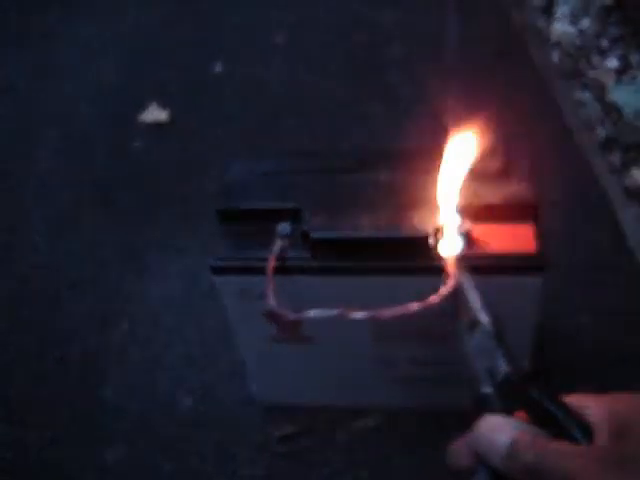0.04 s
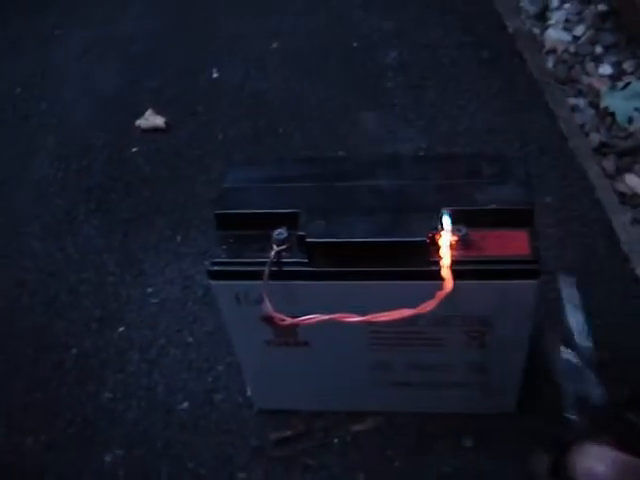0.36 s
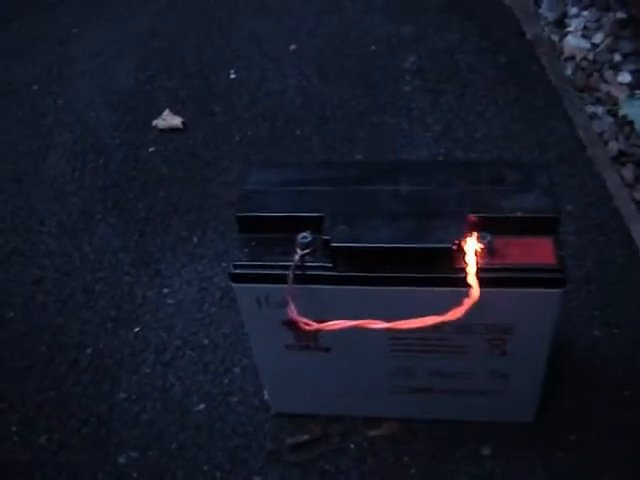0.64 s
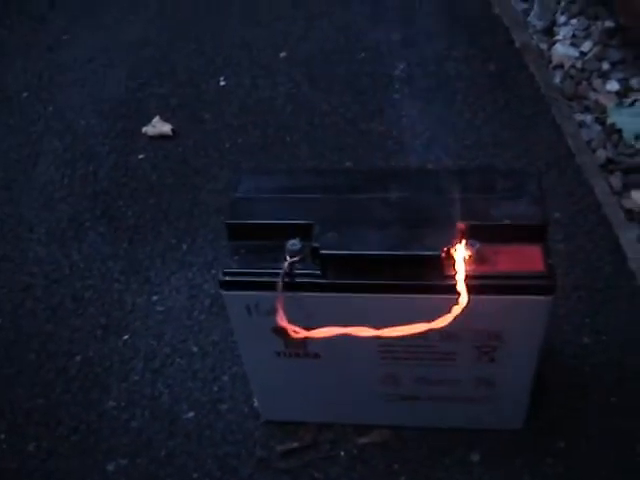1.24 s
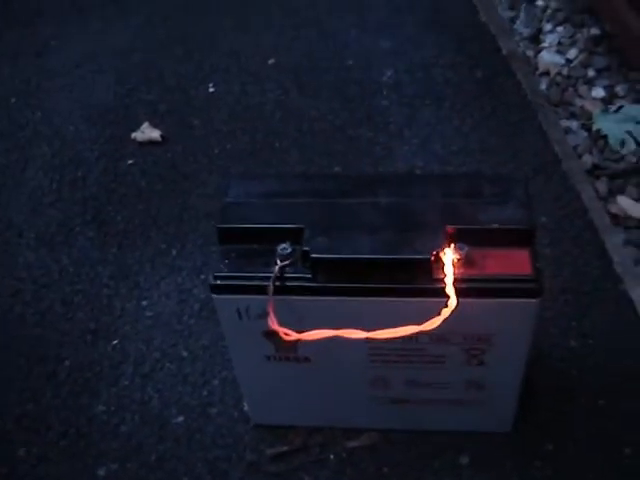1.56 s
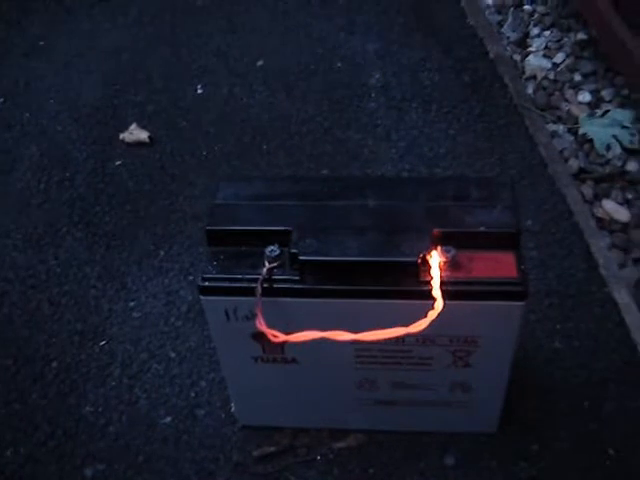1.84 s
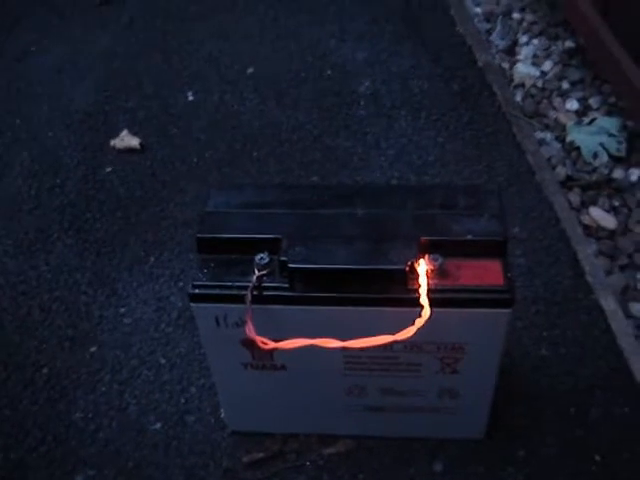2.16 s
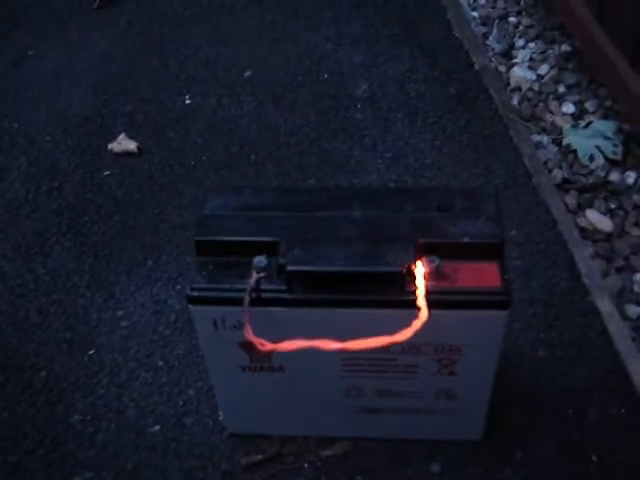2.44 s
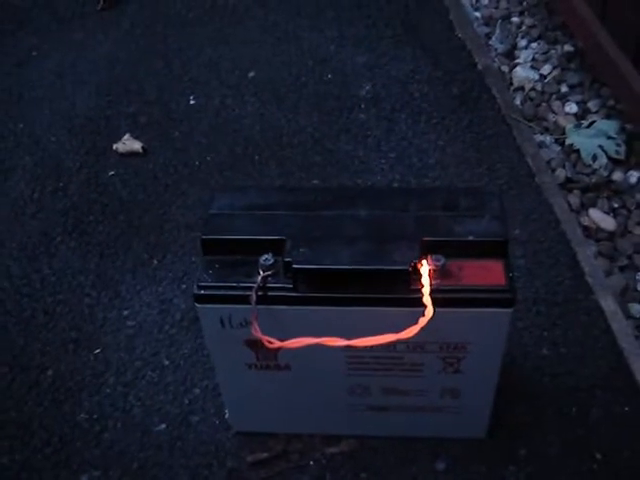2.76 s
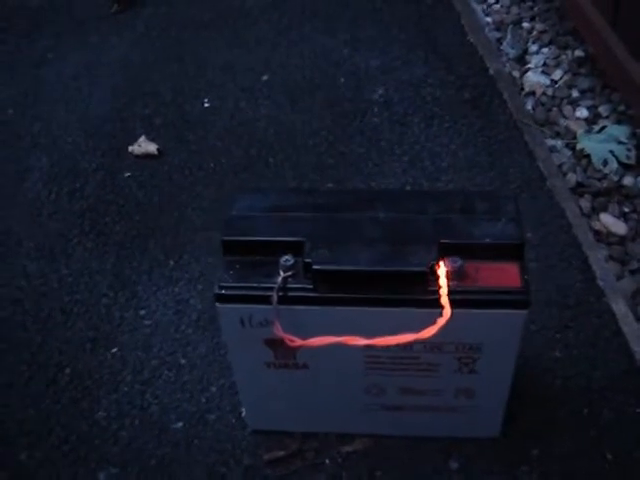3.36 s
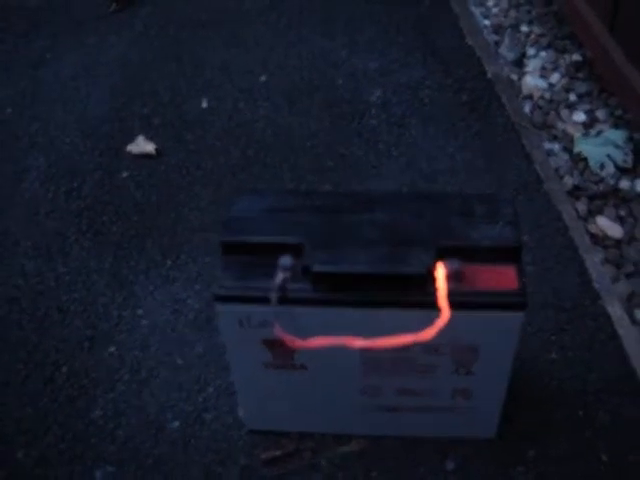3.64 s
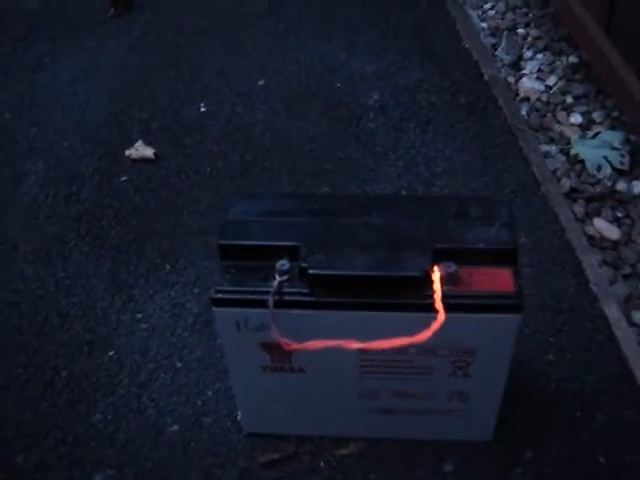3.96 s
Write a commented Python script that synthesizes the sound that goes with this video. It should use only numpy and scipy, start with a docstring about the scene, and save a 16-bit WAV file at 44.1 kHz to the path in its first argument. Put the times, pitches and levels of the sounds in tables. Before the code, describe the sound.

Sharp electrical sparks snap from a shorted battery, then a vehicle approaches in the distance.

```python
"""Short crackling bursts and sharp sparks, close to the microphone: a wire is shorting a lead battery
on a path outdoors. It arcs, with a weak echo off the ground and a fence, then glows and fizzes faintly.
Farther off, a vehicle draws near all the while, tyre roar over a low engine hum, with brief whistles
as it gets closer. A faint hiss lies under it all. The mono recorder's gain control ducks after
the loud bursts and creeps back."""
import sys
import numpy as np
from scipy import signal
from scipy.fft import rfft, irfft
from scipy.io import wavfile

SR = 44100
rng = np.random.default_rng(int(sys.argv[2]) if len(sys.argv) > 2 else 0)


def log_audio(samples):
    """Write samples as a 16-bit WAV file to the path given in sys.argv[1]."""
    # one column per channel
    frames = np.atleast_2d(samples).T
    # limit to full scale, then quantise
    limited = np.clip(frames, -1, 1)
    pcm = np.round(limited * 32767).astype(np.int16)
    wavfile.write(sys.argv[1], SR, pcm)


N = 176400
TIME = np.arange(N) / SR
FREQS = np.maximum(np.arange(N // 2 + 1) * SR / N, 1)

# Arcing at the battery. Each row: start in seconds, length in seconds, level in dB, tilt in dB per octave.
ARC_BURSTS = [(0.0118, 0.0024, -34.5, 2), (0.0734, 0.0078, -28.5, -0.5), (0.0920, 0.0032, -30.5, -9.5),
              (0.1023, .021, -31.5, 13), (0.123, 0.0089, -28.5, 2), (0.136, 0.029, -45, 4.5),
              (0.215, 0.0012, -19, -4.5), (0.231, 0.0023, -29, 1), (1.055, 0.018, -23.5, 2),
              (1.0737, 0.013, -22.5, 3.5), (1.085, 0.0085, -30.5, 5), (1.12, 0.01, -37, 3)]
# Tone of the arc. Each row: frequency in Hz, relative level in dB.
ARC_SPECTRUM = [(100, -14), (450, -18), (1000, -9), (2400, 0.5), (3800, -0.5), (5500, -5), (7800, -10),
                (10000, -12.5)]
# Single loud sparks. Each row: time in seconds, crack peak in dB, puff of hot air in dB.
LOUD_SPARKS = [(0.1060, -10, -28.5), (0.1095, -10.5, -35.5), (0.1214, -9.5, -33), (0.2174, -9.5, -67),
               (1.0583, -10.5, -46), (1.0607, -9, -35), (1.0667, -15, -58), (1.067, -2.5, -35.5),
               (1.0723, -5, -27), (1.0880, -2, -28)]
# The vehicle nearing the microphone. Each row: time in seconds, roar level in dB.
APPROACH_LEVEL = [(0, -45), (.4, -45), (1.0, -40.5), (1.5, -37), (2.1, -36), (2.6, -29.5), (3.0, -27),
                  (3.25, -26), (3.7, -21.5), (4.0, -22)]
# Tone of the tyre roar. Each row: frequency in Hz, relative level in dB.
TYRE_SPECTRUM = [(30, -32), (55, -15.5), (68, -3.5), (110, -9), (180, -2.5), (290, -8.5), (350, -10),
                 (460, -10), (520, 1.5), (830, -3.5), (1400, -4), (2300, -3.5), (3000, -10), (4200, -18),
                 (7000, -30), (10000, -42)]
# Resonances and dips in the roar. Each row: frequency in Hz, width in Hz, lift in dB.
TYRE_RESONANCES = [(295, 36, 4.5), (342, 41, 1.5), (407, 34, 5.5), (533, 12, 1), (616, 39, 3),
                   (689, 61, 4.5), (765, 50, 2.5), (937, 47, -3), (1006, 27, 7.5), (1082, 110, 4.5),
                   (1290, 44, 3), (1540, 90, -0.5), (1614, 48, 6), (1740, 120, 2.5), (1970, 120, 3),
                   (2450, 40, -5), (2480, 34, 1.5)]
# Engine speed. Each row: time in seconds, cycle rate in Hz.
ENGINE_CYCLE_RATE = [(0, 24.5), (1.75, 25), (2.7, 25), (3.2, 25.5), (3.55, 26), (4.0, 26)]
# Engine orders. Each row: multiple of the cycle rate, relative level in dB.
HUM_ORDERS = [(3, -26), (5, -31), (6, -17), (10, -22.5), (12, -32), (16, -23.5), (24, -19), (27, -22)]
# Swell of the engine hum. Each row: time in seconds, gain in dB.
ENGINE_GAIN = [(0, -51.5), (1.1, -46), (1.45, -43.5), (1.8, -34.5), (2.25, -37), (2.85, -26), (3.2, -25),
               (3.45, -28.5), (3.65, -17.5), (4.0, -23)]
# Tone of the background hiss. Each row: frequency in Hz, relative level in dB.
HISS_SPECTRUM = [(100, 1), (2000, 3), (6000, 0), (10000, -8.5)]
# The hot wire fizzing. Each row: start in seconds, length in seconds, level in dB.
FIZZ_SPURTS = [(1.212, 0.13, -45.5), (1.485, 0.047, -48.5), (3.192, 0.086, -46), (3.392, 0.13, -46.5),
               (3.634, 0.12, -46.5)]
# Tone of the fizz. Each row: frequency in Hz, relative level in dB.
FIZZ_SPECTRUM = [(2500, -19), (4500, -9), (5600, -1.5), (6900, -1.5), (8000, -9.5), (10000, -22)]
# Whistles. Each row: start in seconds, length in seconds, pitch in Hz, level in dB against the roar.
ROAR_WHISTLES = [(2.983, .38, 1968, -10), (3.18, 0.13, 2830, -15), (3.39, 0.22, 2940, -17),
                 (3.58, .17, 3086, -18.5), (3.896, 0.079, 2210, -8)]

ARC_ATTACK_S, ARC_DECAY_S, DISCHARGES_PER_S, DISCHARGE_SPREAD_DB = 0.0017, 0.0041, 12000, 1
SPARK_LOW_HZ, SPARK_HIGH_HZ, PUFF_S, PUFF_LOW_HZ = 2050, 6800, 0.0033, 5.5
ECHO_DB, ECHO_T60_S, ECHO_DELAY_S = -22, 0.81, 0.013
TYRE_FLICKER_DB, TYRE_FLICKER_HZ = 1.14, 17.4
BODY_HZ, BODY_OCTAVES, BODY_GROWTH = 503, 0.37, 0.2  # growth: extra dB per dB of approach, at BODY_HZ
ENGINE_WOBBLE, ENGINE_ROUGH = 0.0056, 0.19  # fractions of speed and of amplitude
DRONE_HZ, DRONE_BEAT_HZ, DRONE_DB = 41.76, 2.3, -22.5
HISS_DB, WHINE_HZ, WHINE_DB = -55.5, 7930, -72
DUCK_ABOVE_DB, DUCK_SHARE, DUCK_ATTACK_S, RECOVER_DB_PER_S, SENSE_HZ = -21.5, 0.76, 0.023, 12, 4270
TREBLE_EDGE_HZ, MIRROR_HZ, MIRROR_DB, CUTOFF_HZ = 10100, 16000, -47, 15500


def from_db(db):
    """Decibels to gain."""
    return 10 ** (np.asarray(db) / 20)


def rms_one(x):
    """Scale to rms 1."""
    return x / np.sqrt(np.mean(x ** 2) + 1e-20)


def in_time(rows):
    """Join rows of seconds and value by straight lines."""
    return np.interp(TIME, *np.transpose(rows))


def colour_db(points):
    """Spread rows of Hz and dB over every frequency."""
    hz, db = np.transpose(points)
    return np.interp(np.log(FREQS), np.log(hz), db)


def coloured(x, db):
    """Causal (minimum-phase) filter with the given dB at every frequency."""
    cepstrum = irfft(np.log(from_db(db)), N)
    cepstrum[1:N // 2] *= 2
    cepstrum[N // 2 + 1:] = 0
    return irfft(rfft(x) * np.exp(rfft(cepstrum)), N)


def noise(db):
    """Noise of the given colour, rms 1."""
    return rms_one(irfft(rfft(rng.standard_normal(N)) * from_db(db), N))


def narrow(hz, width_hz):
    """A wavering tone: noise in one narrow resonance."""
    return noise(-20 * np.log10(1 + ((FREQS - hz) / width_hz) ** 2))


def drift(rate_hz):
    """Slow random wander, rms 1."""
    return narrow(0, rate_hz)


def butter(x, hz, kind, order=2):
    """Butterworth filter."""
    sections = signal.butter(order, np.clip(hz, 5, 20000), kind, fs=SR, output="sos")
    return signal.sosfilt(sections, x + 1e-18)


def steep_lowpass(x, hz):
    """Linear-phase low-pass that keeps spikes sharp."""
    taps = signal.firwin(401, hz, window=("kaiser", 8), fs=SR)
    return signal.fftconvolve(x, taps[None], "same")


def envelope(start, length, attack_s, decay_s):
    """Straight attack, hold, exponential release."""
    rise = np.clip((TIME - start) / attack_s, 0, 1)
    return rise * np.exp(-np.maximum(TIME - start - length, 0) / decay_s)


def arcs():
    """The wire arcs close by: each burst is a dense swarm of tiny discharges of uneven size."""
    out = np.zeros(N)
    for start, length, db, tilt in ARC_BURSTS:
        sizes = from_db(DISCHARGE_SPREAD_DB * np.minimum(rng.exponential(1, N), 4))
        signs = rng.choice([-1, 1], N)
        fires = rng.random(N) < DISCHARGES_PER_S / SR
        swarm = rms_one(sizes * signs * fires) * envelope(start, length, ARC_ATTACK_S, ARC_DECAY_S)
        colour = colour_db(ARC_SPECTRUM) + tilt * np.log2(np.clip(FREQS, 1000, TREBLE_EDGE_HZ))
        power_db = 10 * np.log10(np.mean(from_db(colour) ** 2 * (FREQS < TREBLE_EDGE_HZ)))
        out += coloured(swarm, colour - power_db + db)
    return out


def sparks():
    """Each spark reaches the microphone as one sharp pressure spike and a slower puff of heated air."""
    cracks, puffs = np.zeros(N), np.zeros(N)
    for start, crack_db, puff_db in LOUD_SPARKS:
        cracks[int(start * SR)] -= from_db(crack_db)
        age = np.maximum(TIME - start, 0) / PUFF_S
        puffs -= from_db(puff_db) * age * np.exp(1 - np.minimum(age, 100))
    cracks = butter(cracks, SPARK_LOW_HZ, "high", order=1)
    cracks = butter(cracks, SPARK_HIGH_HZ, "low")
    loudest_db = max(crack_db for _, crack_db, _ in LOUD_SPARKS)
    cracks *= from_db(loudest_db) / np.abs(cracks).max()
    return cracks + butter(puffs, PUFF_LOW_HZ, "high", order=1)


def echoes(x):
    """A short, weak scatter from the ground and the fence."""
    tail = rng.standard_normal(N) * from_db(-60 * TIME / ECHO_T60_S) * (TIME > ECHO_DELAY_S)
    tail /= np.sqrt(np.sum(tail ** 2))
    return from_db(ECHO_DB) * signal.fftconvolve(x, tail)[:N]


def tyres(level_db):
    """Distant tyre roar with resonances, fuller as it nears; each octave flickers on its own."""
    resonances = sum(db * np.exp(-2 * ((FREQS - hz) / width) ** 2) for hz, width, db in TYRE_RESONANCES)
    roar = rfft(noise(colour_db(TYRE_SPECTRUM) + resonances))
    octave = np.clip(np.log2(FREQS / 40), 0, 8)  # counted up from 40 Hz
    out = np.zeros(N)
    for k in range(9):
        band = irfft(roar * np.maximum(1 - np.abs(octave - k), 0), N)
        from_body = k - np.log2(BODY_HZ / 40)
        body_db = BODY_GROWTH * np.exp(-(from_body / BODY_OCTAVES) ** 2) * (level_db - level_db.mean())
        flicker_db = TYRE_FLICKER_DB * drift(TYRE_FLICKER_HZ)
        out += band * from_db(level_db + body_db + flicker_db)
    return out


def engine():
    """A few unsteady orders of the engine cycle over a low drone, throbbing as two close tones beat."""
    def rough_tone(phase, rate_hz):
        return np.sin(phase + rng.uniform(0, 2 * np.pi)) * (1 + ENGINE_ROUGH * drift(rate_hz))

    cycle_hz = in_time(ENGINE_CYCLE_RATE) * (1 + ENGINE_WOBBLE * drift(rate_hz=6.2))
    cycle_phase = 2 * np.pi * np.cumsum(cycle_hz) / SR
    hum = sum(from_db(db) * np.sqrt(2) * rough_tone(order * cycle_phase, rate_hz=4.5)
              for order, db in HUM_ORDERS)
    pair_hz = DRONE_HZ - DRONE_BEAT_HZ / 2, DRONE_HZ + DRONE_BEAT_HZ / 2
    drone = sum(rough_tone(2 * np.pi * hz * TIME, rate_hz=1.5) for hz in pair_hz)
    return from_db(in_time(ENGINE_GAIN)) * (hum + from_db(DRONE_DB) * drone)


def hiss():
    """Faint, steady background hiss with a thin whine in it."""
    bed = from_db(HISS_DB) * noise(colour_db(HISS_SPECTRUM))
    return bed + from_db(WHINE_DB) * narrow(WHINE_HZ, width_hz=50)


def fizz():
    """Soft spurts of high hiss from the glowing wire near the microphone."""
    level = sum(from_db(db) * envelope(start, length, attack_s=0.01, decay_s=0.12)
                for start, length, db in FIZZ_SPURTS)
    return level * noise(colour_db(FIZZ_SPECTRUM))


def whistles():
    """Short, rough whistles within the roar as the vehicle gets closer."""
    return sum(from_db(db) * envelope(start, length, attack_s=0.04, decay_s=0.04) * narrow(hz, width_hz=22)
               for start, length, hz, db in ROAR_WHISTLES)


def scene():
    """One microphone on the path: the short circuit close by, the vehicle behind it."""
    short_circuit = arcs() + sparks()
    approach_db = in_time(APPROACH_LEVEL)
    vehicle = tyres(approach_db) + from_db(approach_db) * whistles() + engine()
    return (short_circuit + vehicle + hiss() + echoes(short_circuit) + fizz())[None]


def gain_control(x):
    """Treble peaks pull the recorder's gain down; it recovers at a steady rate."""
    treble_db = 20 * np.log10(np.abs(butter(x, SENSE_HZ, "high")) + 1e-9)
    wanted_db = DUCK_SHARE * np.maximum(treble_db - DUCK_ABOVE_DB, 0)
    recovery_db = RECOVER_DB_PER_S * TIME
    held_db = np.maximum.accumulate(wanted_db + recovery_db, axis=-1) - recovery_db
    pole = np.exp(-1 / (DUCK_ATTACK_S * SR))
    duck_db = signal.lfilter([1 - pole], [1, -pole], held_db)
    return x * from_db(-duck_db)


def record(dry):
    """Narrow-band recorder with gain control; a faint mirror image of the lows lies high in the treble."""
    ducked = gain_control(steep_lowpass(dry, TREBLE_EDGE_HZ))
    lows = butter(ducked, 2000, "low", order=6)
    mirror = lows * 2 * np.cos(2 * np.pi * MIRROR_HZ * TIME)
    return steep_lowpass(ducked + from_db(MIRROR_DB) * mirror, CUTOFF_HZ)


dry = scene()
out = record(dry)
log_audio(out)
```